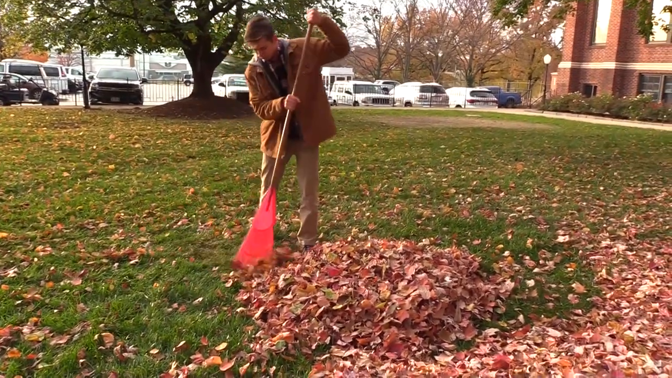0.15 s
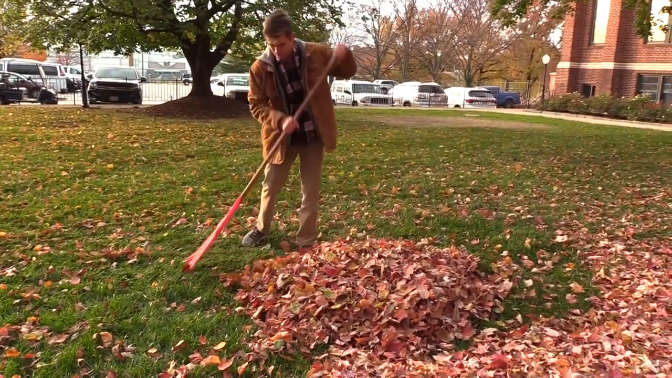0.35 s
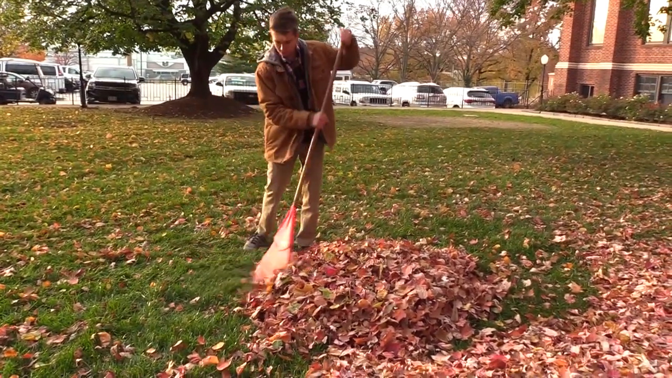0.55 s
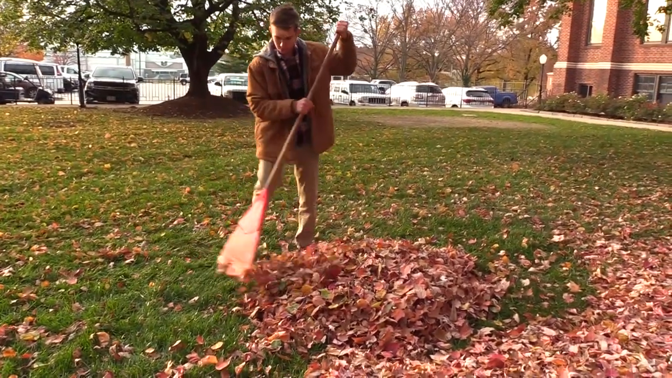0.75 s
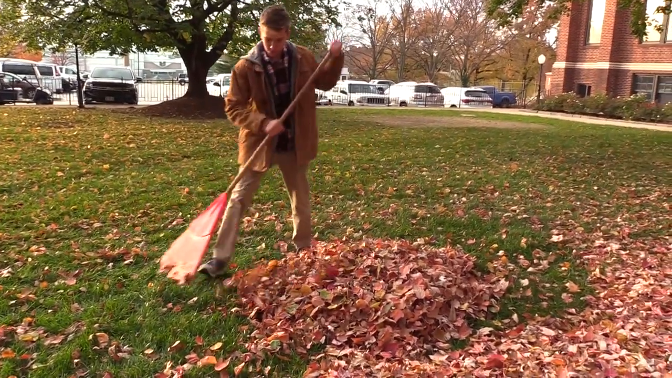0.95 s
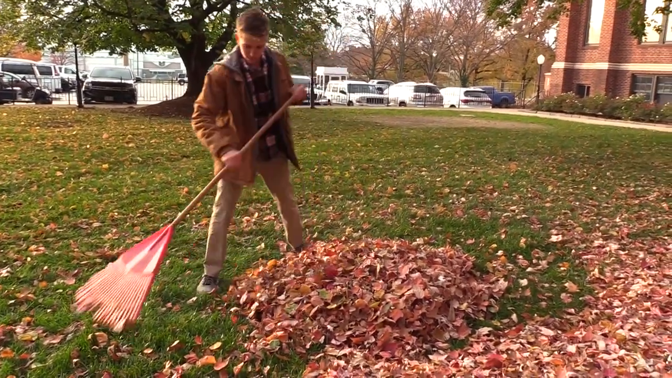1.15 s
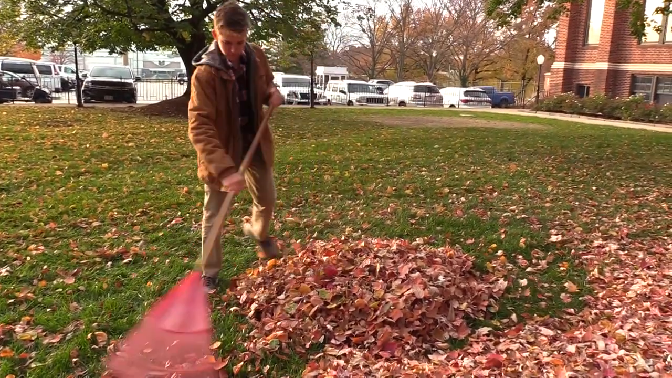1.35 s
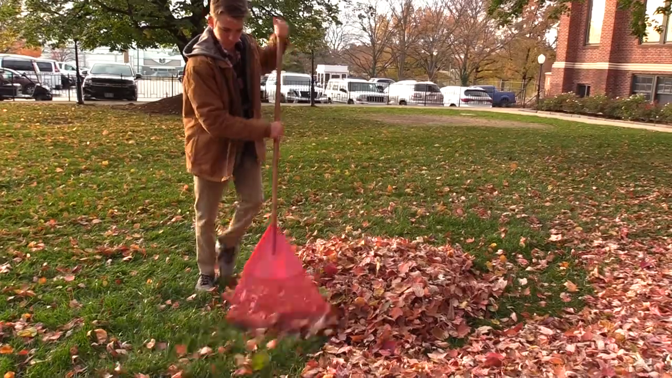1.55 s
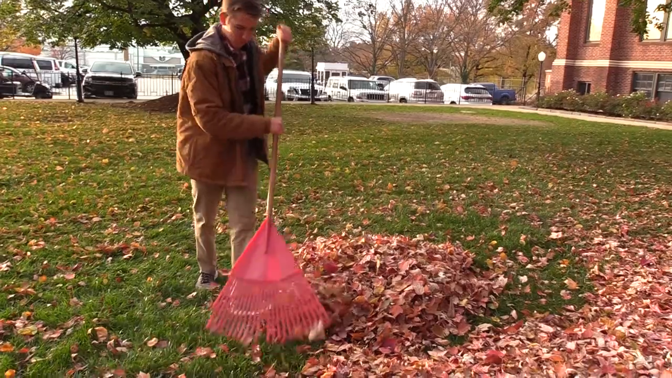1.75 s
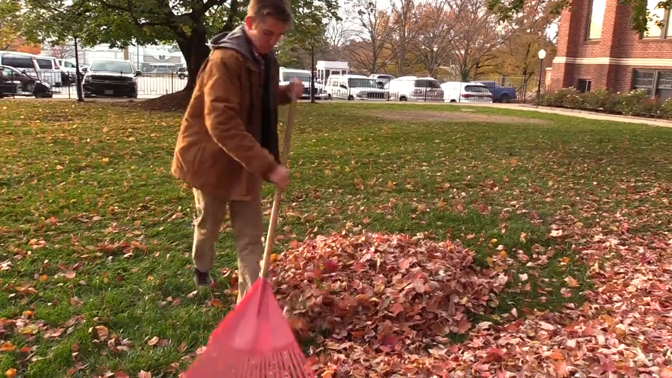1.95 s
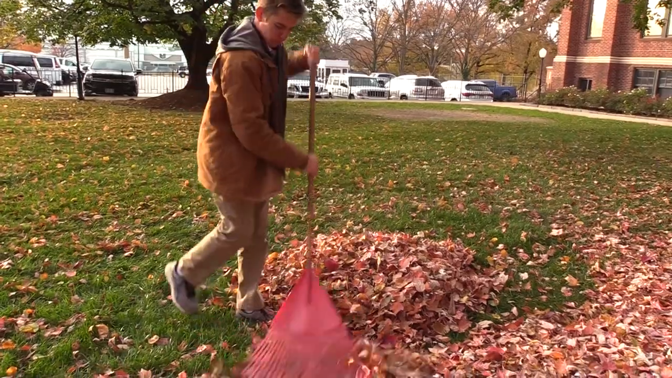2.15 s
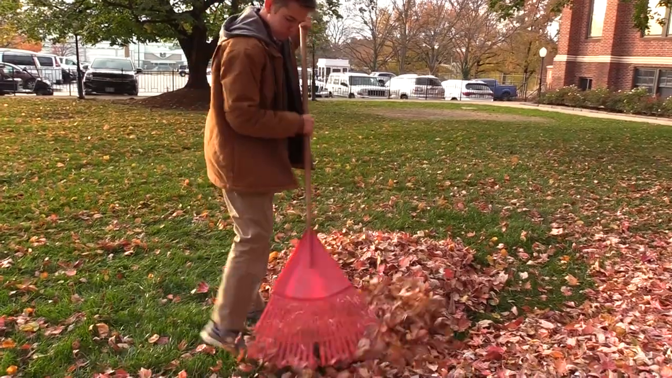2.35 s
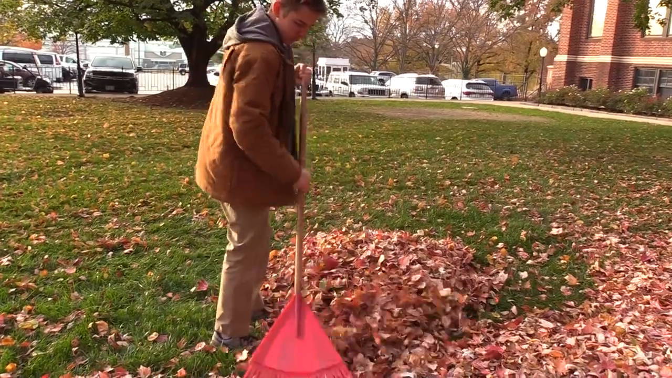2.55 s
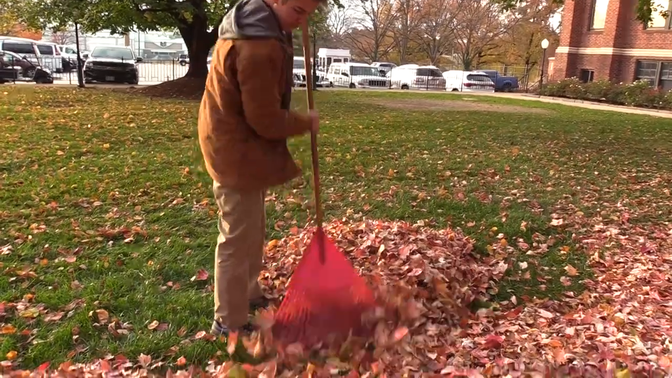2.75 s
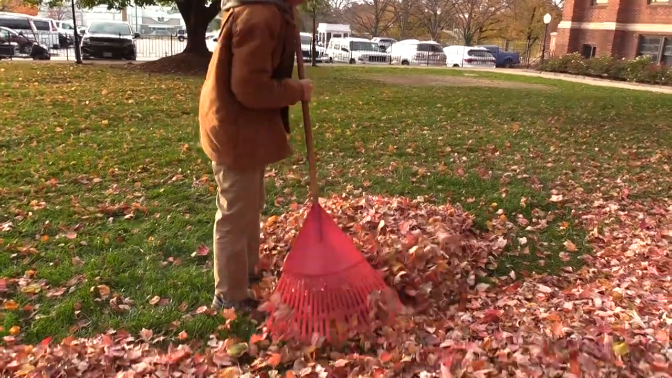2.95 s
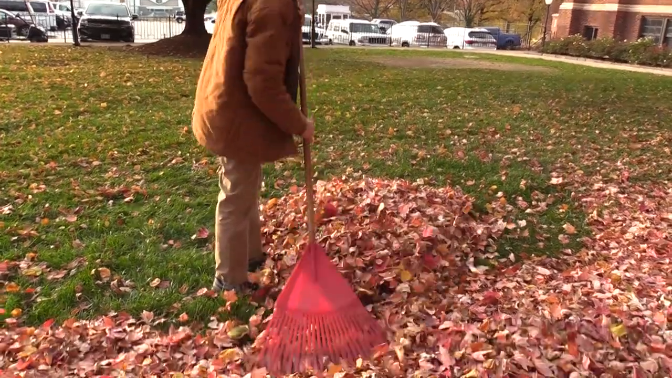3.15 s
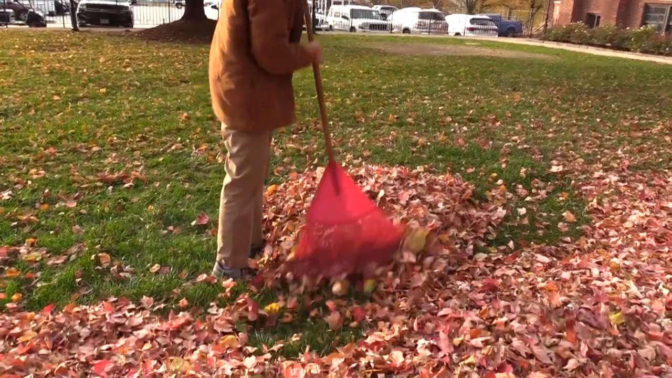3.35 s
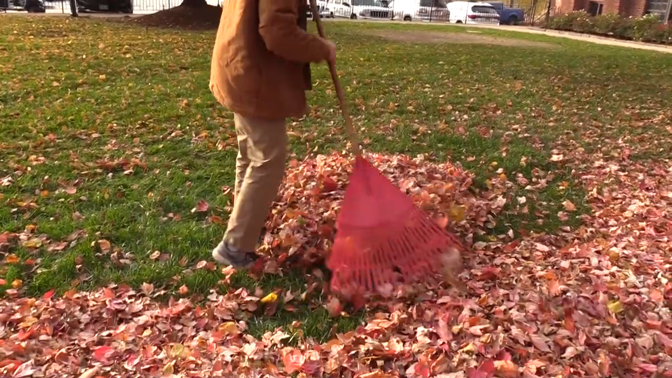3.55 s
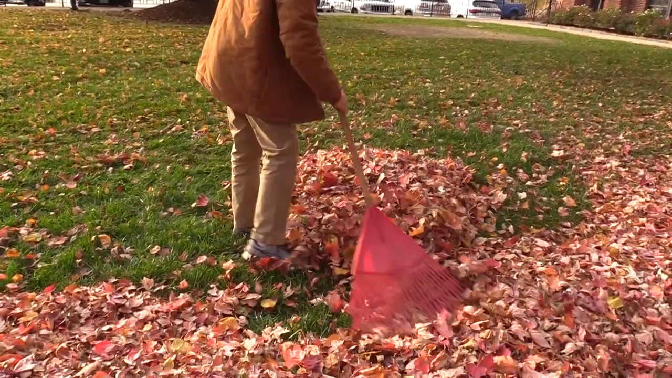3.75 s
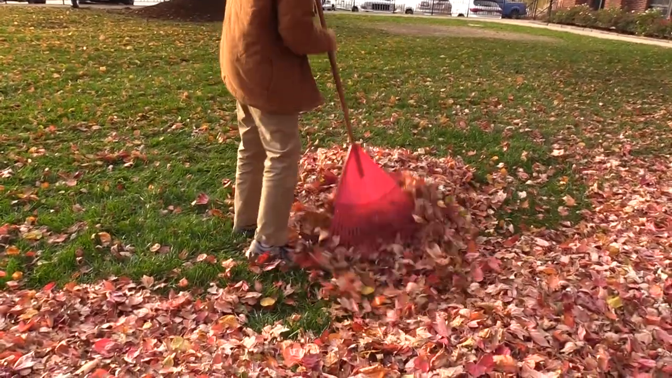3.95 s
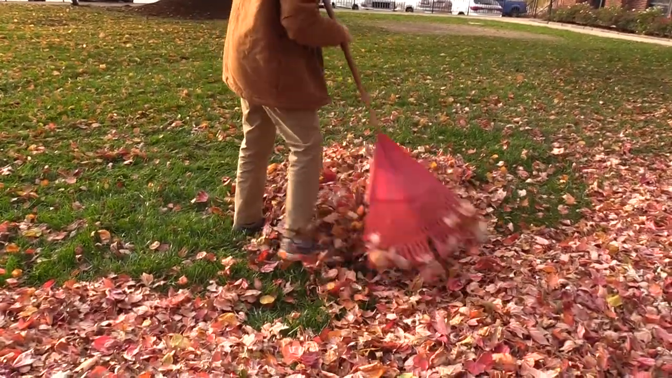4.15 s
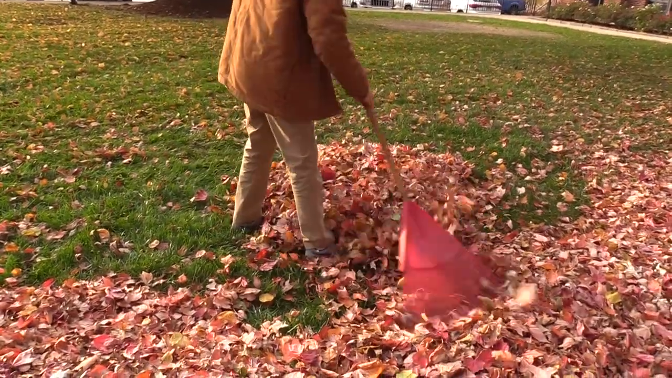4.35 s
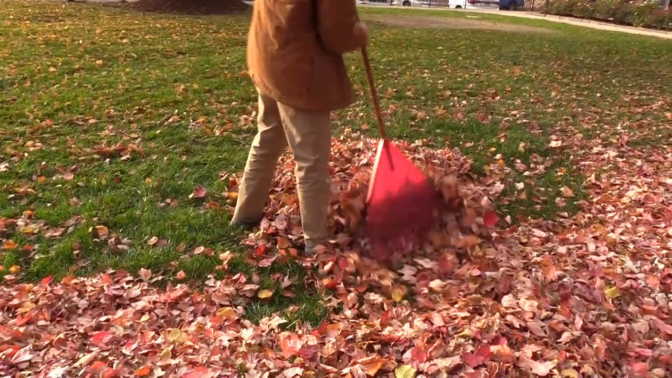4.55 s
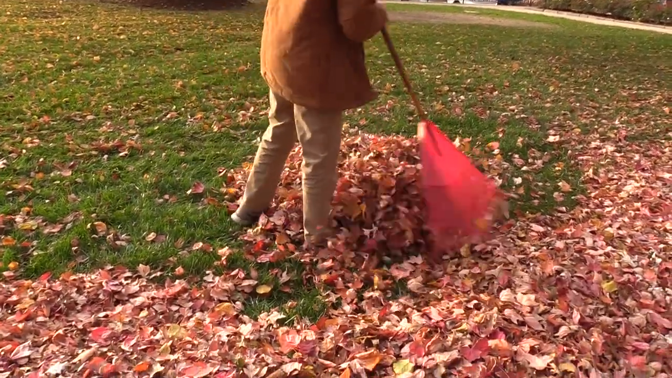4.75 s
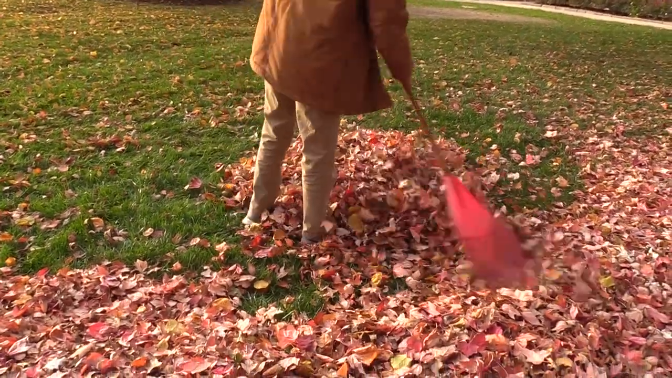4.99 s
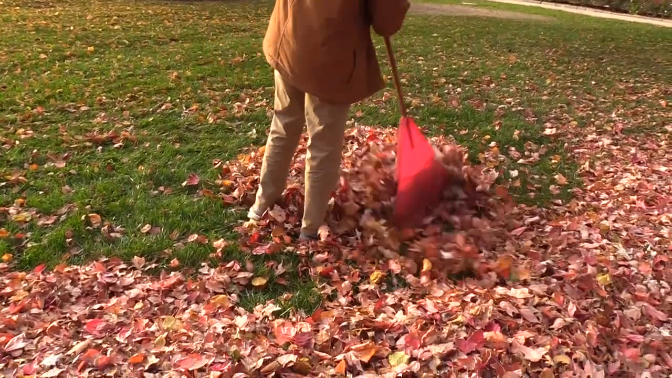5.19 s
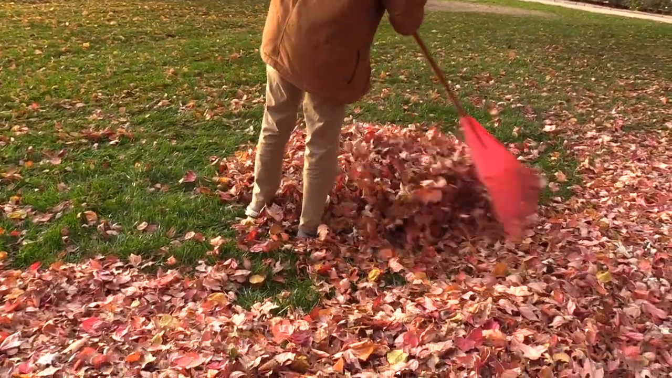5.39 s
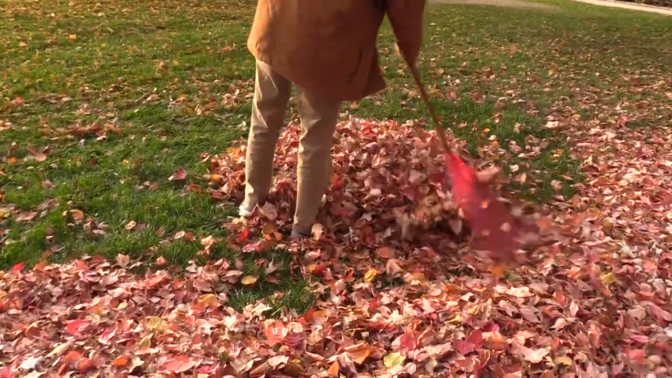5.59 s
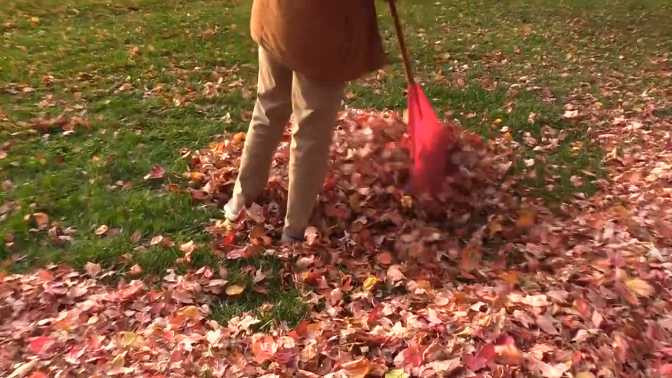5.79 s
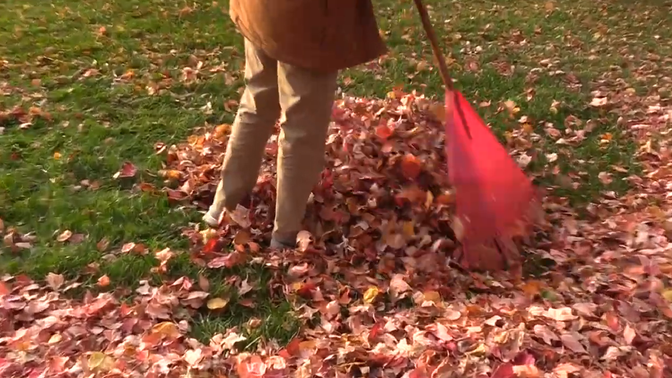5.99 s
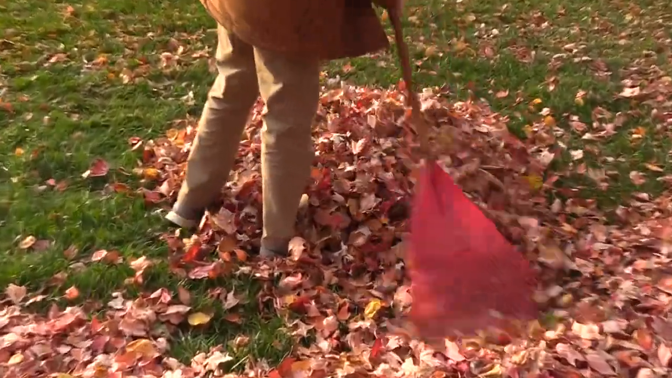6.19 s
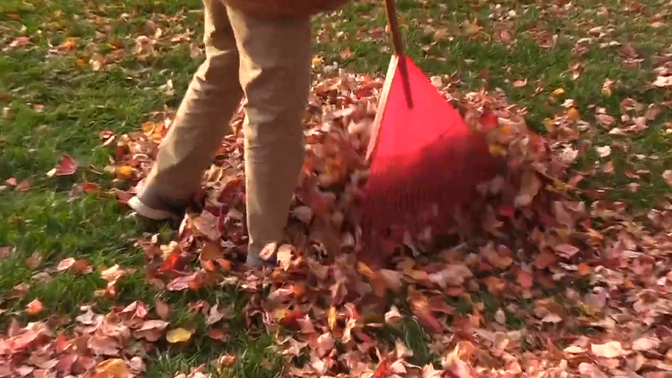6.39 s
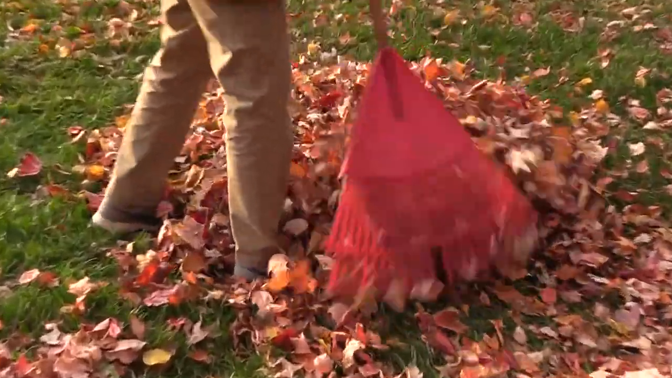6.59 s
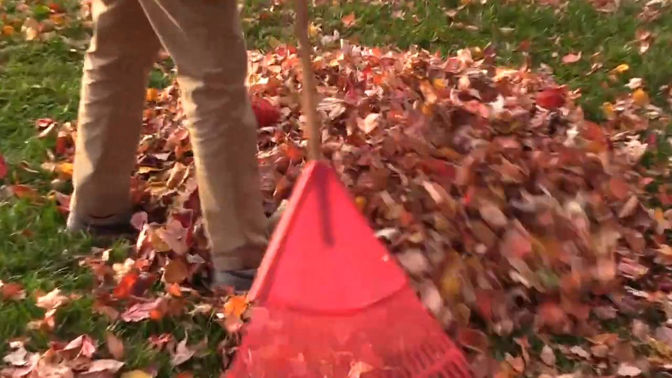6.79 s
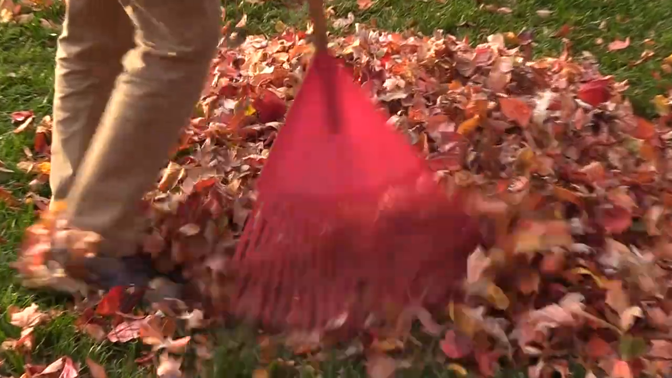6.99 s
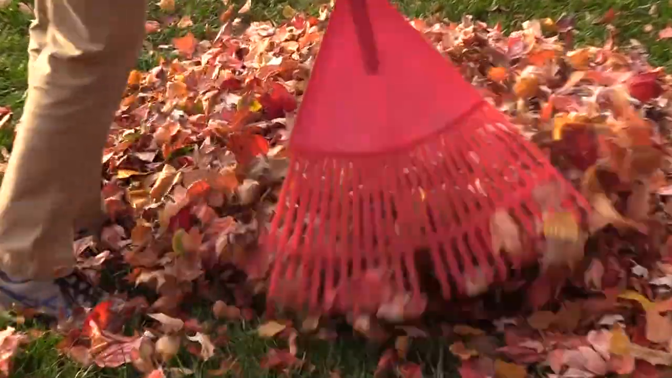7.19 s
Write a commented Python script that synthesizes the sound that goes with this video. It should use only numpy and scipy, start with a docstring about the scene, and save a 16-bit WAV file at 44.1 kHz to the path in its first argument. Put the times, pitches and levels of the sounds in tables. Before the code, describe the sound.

A plastic rake sweeps dry fallen leaves in a dozen crunchy strokes, growing louder, over low wind rumble and faint distant traffic.

```python
"""A plastic rake sweeps dry leaves into a pile on a lawn: a dozen strokes, growing louder as if coming nearer.
Each stroke is a dense shower of tiny fractures, coloured as crushed leaves, hissing tines and drag on the turf.
The fan booms on bare turf, stems snap in short noise bursts, and blows ring the damped modes of the plastic.
Behind the rake, shaped noise makes distant traffic and wind rumbling on the microphone; two wavering
tones are far engines. Both channels are alike."""
import sys
import numpy as np
from scipy import signal
from scipy.fft import rfft, irfft, next_fast_len
from scipy.io import wavfile

SR = 44100
rng = np.random.default_rng(int(sys.argv[2]) if len(sys.argv) > 2 else 0)


def dump(signal):
    """Clip the signal to [-1, 1] and save it as 16-bit WAV at the path in sys.argv[1]."""
    limited = np.clip(np.atleast_2d(signal).T, -1, 1)
    pcm = np.round(limited * 32767).astype(np.int16)
    wavfile.write(sys.argv[1], SR, pcm)


N = 318843  # samples, about 7.23 s

# Spectrum of crushed leaves: pitch_hz, relative level_db (per Hz)
LEAF_SPECTRUM = [(200, -49), (700, -18), (1500, -7.5), (2100, -6), (2550, -3.5), (2950, -1.25),
                 (3380, -1.5), (3700, -3.5), (4100, -7.5), (4700, -8.5), (6500, -15), (10000, -29),
                 (16000, -40)]
# Spectrum of tines combing leaves and grass: pitch_hz, relative level_db (per Hz)
COMB_SPECTRUM = [(1500, -32), (3500, -5), (5000, -1.5), (6500, 1), (8200, 0), (9500, -3), (12500, -7),
                 (14500, -10.5), (16000, -16.5)]
# Spectrum of the rake head dragging on the turf: pitch_hz, relative level_db (per Hz)
DRAG_SPECTRUM = [(90, -29), (190, -6), (310, -3), (500, 1), (750, -1), (1200, -1), (1800, -15.5),
                 (3000, -20)]


def raking():
    """Harder strokes break more leaves a second; the tines catch and slip, so the fractures come in clumps."""
    rustle_db, hiss_db, drag_db = effort()
    fractures_per_s = 80000 * gain_of(0.5 * (rustle_db + 15))

    crushing = crackle(fractures_per_s, spread_db=2.0, cycles=2.06, patchy_db=1.34)
    leaves = colour(crushing, LEAF_SPECTRUM) * gain_of(rustle_db + 1.74)

    combing = crackle(fractures_per_s, spread_db=1.0, cycles=1.55, patchy_db=1.1)
    comb = colour(combing, COMB_SPECTRUM)
    highpass = signal.butter(2, 10000, "high", fs=SR, output="sos")
    treble = signal.sosfiltfilt(highpass, comb)
    comb = comb + treble * (gain_of(0.89 * (hiss_db + 6.5)) - 1)  # stronger hiss is brighter
    tines = comb * gain_of(rustle_db + hiss_db + 0.78)

    scraping = crackle(fractures_per_s, spread_db=3.5, cycles=2.85, patchy_db=0.8)
    contact = 1 / (1 + gain_of(-35.5 - rustle_db) ** 2)  # a lifted rake no longer scrapes the turf
    turf = colour(scraping, DRAG_SPECTRUM) * contact * gain_of(rustle_db + drag_db + 1.4)
    return catches(per_s=86, decay_s=0.0068, depth=0.27) * (leaves + tines + turf)


def crackle(per_s, spread_db, cycles, patchy_db, count=18):
    """A shower of tiny fractures of random size, each ringing a few cycles at its own pitch; white overall."""
    size = next_fast_len(N)
    t = np.arange(1024) / SR
    clumps = np.arange(0, N + SR // 25, SR // 25)  # one every 40 ms
    total, power = 0, 0
    for hz in np.geomspace(400, 15000, count):
        clump_db = patchy_db * rng.standard_normal(len(clumps))  # each clump of leaves favours other pitches
        at = np.flatnonzero(rng.random(N) < per_s / count / SR)
        size_db = spread_db * np.minimum(rng.exponential(1, len(at)), 4)
        size_db = size_db + np.interp(at, clumps, clump_db)
        clicks = np.zeros(N)
        # Denser showers have smaller clicks, so density alone does not raise the level
        clicks[at] = rng.choice([-1, 1], len(at)) * gain_of(size_db) / np.sqrt(per_s[at])
        ring = rfft(np.exp(-t * hz / cycles) * np.cos(2 * np.pi * hz * t), size)
        ring /= abs(ring).max()
        total = total + rfft(evened(clicks), size) * ring
        power = power + abs(ring) ** 2
    return irfft(total / np.sqrt(power), size)[:N]


def catches(per_s, decay_s, depth):
    """A gain of unit rms: tines catch on a clump, let go at once, and the flurry dies away."""
    jolts = rng.exponential(1, N) * (rng.random(N) < per_s / SR)
    flurry = signal.lfilter([1], [1, -np.exp(-1 / (decay_s * SR))], jolts)
    return evened(np.sqrt(1 + abs(depth) * flurry))


# Pulls of the rake: landing start_s, rise_s to full speed, slow_s to slow down, rustle_db at full speed;
# then over that rustle: brush_db of leaves on the way down, land_db on landing, settle_db of settling
# leaves, hiss_db of the tines, drag_db on the ground
RAKE_STROKES = [(-0.108, .031, 0.29, -24, -16.5, -3, -20, -1.5, -4.5),
                (0.492, 0.074, .17, -22, -21, -3.5, -15, -4, -11),
                (1.379, .11, .15, -16.5, -27, -3, -15, -1, -8.5),
                (1.963, .17, .24, -13, -20, -10.5, -15, -3.5, -9),
                (2.538, 0.13, 0.26, -14, -15.5, -5.5, -13, -3, -9),
                (3.072, .21, .213, -13.5, -20.5, -8.5, -17.5, -5, -9),
                (3.649, .23, .157, -12, -19, -7.5, -11.5, -5, -10.5),
                (4.303, .13, 0.29, -13.5, -14, -7, -19, -4.5, -8.5),
                (4.917, .158, .231, -13, -13, -2.5, -12, -4.5, -11),
                (5.48, 0.2, .21, -14, -17, -4.5, -13.5, -4.5, -12.5),
                (6.092, .24, 0.18, -15, -16.5, -7, -13.5, -5.5, -9),
                (6.732, .27, .16, -13.5, -16, -12, -12.5, -5.5, -9.5)]
# Heaps of leaves shoved or tumbling over: loudest_s, length_s, level_db of their rustle
LEAF_HEAPS = [(0.095, 0.043, -26.5), (0.591, .058, -20.5), (0.735, .048, -26.5), (0.923, .52, -37.5),
              (1.586, .15, -18.5), (1.8, 0.25, -27), (2.345, 0.11, -21.5), (2.787, 0.098, -23),
              (2.915, 0.037, -20.5), (3.325, .035, -17.5), (4.071, 0.082, -22), (4.548, 0.085, -19.5),
              (5.182, 0.099, -20), (6.285, .14, -17)]
STIR_DB = -47.0  # leaves stirring when the rake is still


def effort():
    """Strokes and loose leaves add in power: rustle in dB, then hiss and drag in dB over the rustle."""
    power = sum(stroke(*row) for row in RAKE_STROKES)
    power = power + sum(heap(*row) for row in LEAF_HEAPS) + loose(gain_of(STIR_DB))
    rustle_db, hiss_db, drag_db = 10 * np.log10(power)
    return rustle_db, hiss_db - rustle_db, drag_db - rustle_db


LAND_S = 0.036  # the tines sink into the leaves
BRUSH_S = 0.265  # around the landing the fan brushes the top leaves
SLOWED_DB = -10.0  # drop of the rustle when the slowing time is over
SETTLE_DB_PER_S = 13.5  # the leaves that were moved come to rest
HISS_SAG_DB_PER_S, DRAG_SAG_DB_PER_S = 8, 11  # leaves gather in front of the tines and cushion them


def stroke(start, rise, slow, db, brush_db, land_db, settle_db, hiss_db, drag_db):
    """The rake comes down, speeds up, slows and leaves the pile settling: power of rustle, hiss and drag."""
    t = np.maximum(np.arange(N) / SR - start, 0)
    landing_db = land_db * np.cos(np.pi / 2 * np.minimum(t / rise, 1)) ** 2
    slowing_db = SLOWED_DB * (np.maximum(t - rise, 0) / slow) ** 2
    pull = np.minimum(t / LAND_S, 1) ** 2 * gain_of(db + landing_db + slowing_db)
    hiss = gain_of(hiss_db - HISS_SAG_DB_PER_S * (t - rise))
    drag = gain_of(drag_db - DRAG_SAG_DB_PER_S * (t - rise))

    rest_db = SETTLE_DB_PER_S * np.maximum(t - rise - slow, 0)
    settle = np.minimum(t / (rise + slow), 1) ** 2 * gain_of(db + settle_db - rest_db)
    pulled = np.array([pull, pull * hiss, pull * drag]) ** 2
    return pulled + loose(settle) + heap(start, BRUSH_S, db + brush_db)


def heap(s, length, db):
    """A heap of loose leaves swells and dies away."""
    return loose(gain_of(db) * swell(s, length))


SETTLE_HISS_DB, SETTLE_DRAG_DB = -4.5, -12  # hiss and drag over the rustle of loose leaves


def loose(size):
    """Leaves moving freely rustle, with less hiss and drag: power of the three."""
    return (size * gain_of([[0], [SETTLE_HISS_DB], [SETTLE_DRAG_DB]])) ** 2


# The fan pressed hard on bare turf: loudest_s, level_db, length_s
TURF_SCUFFS = [(0.04, -31.5, 0.18), (1.513, -21, 0.18), (3.24, -22.5, 0.15), (6.942, -22.5, 0.2)]
# Hollow resonances of the whole fan pressed down: pitch_hz, width_hz, relative level_db
FAN_HOLLOW = [(318, 79, 1.5), (637, 135, 3.5), (780, 41, -2.5)]


def scuffs():
    """With no cushion of leaves under it, the dragging fan booms like a shallow box."""
    friction = rng.standard_normal(N)
    pressure = np.zeros(N)
    for s, db, length in TURF_SCUFFS:
        pressure += gain_of(db) * swell(s, length)
    boom = np.zeros(N)
    for hz, width, db in FAN_HOLLOW:
        b, a = signal.iirpeak(hz, hz / width, fs=SR)
        boom += gain_of(db) * signal.lfilter(b, a, friction)
    return pressure * evened(boom)


# Single stems and leaves snapping: start_s, peak level_db, pitch_hz
STEM_SNAPS = [(0.1584, -15, 6960), (0.1735, -16, 7260), (0.5254, -18, 7210), (0.7378, -18, 7070),
              (1.1256, -26, 6290), (1.1677, -26, 7030), (1.3854, -17, 9900), (1.4014, -9, 8280),
              (1.4077, -6, 8220), (1.8224, -24, 6200), (1.8682, -16, 7980), (1.9939, -11, 7140),
              (2.963, -10, 6025), (2.997, -9.5, 9740), (3.0117, -14, 7680), (3.0638, -17, 6080),
              (3.5828, -20.5, 7010), (3.675, -18, 6326), (5.5033, -14, 6220), (6.1235, -8, 6490)]


def snaps():
    """A dry stem gives way in a millisecond burst, and the leaves around it shiver briefly."""
    out = np.zeros(N)
    t = np.arange(2500) / SR
    fade = np.exp(-t / 0.0015) + 0.36 * np.exp(-t / 0.011)  # snap, then shiver
    for s, db, hz in STEM_SNAPS:
        noise = rng.standard_normal(len(t))
        edges_hz = [hz * 0.55, min(hz * 1.6, SR / 2.2)]
        band = signal.butter(1, edges_hz, "band", fs=SR, output="sos")
        burst = signal.sosfilt(band, noise * fade)
        add(out, s, gain_of(db) * burst / abs(burst).max())
    return out


# The plastic fan striking or catching the ground: start_s, level_db (8 dB above the peak it is played at)
FAN_CLACKS = [(1.562, 1), (2.905, 9), (2.908, 9), (3.119, 1), (3.198, -8), (3.703, -8), (4.951, 3),
              (5.503, -5), (6.123, -4), (6.237, 8), (6.884, 8)]
# Modes of the plastic fan: pitch_hz (before detuning), relative level_db, t60_s
FAN_MODES = [(520, -6, 0.0084), (1230, -8, 0.0093), (2060, -12, 0.0076), (2800, -4, .008),
             (3210, 3, 0.0058), (5600, 1, 0.0034)]


def clacks():
    """A blow rings the heavily damped plastic fan, its modes detuned a little differently each time."""
    out = np.zeros(N)
    t = np.arange(2000) / SR
    for s, db in FAN_CLACKS:
        ring = np.zeros(len(t))
        for hz, level, t60 in FAN_MODES:
            struck_hz = hz * (1 + 0.058 * rng.uniform(-1.2, 1))
            ring += gain_of(level - 60 * t / t60) * np.sin(2 * np.pi * struck_hz * t)
        ring = ring * (1 - np.exp(-t / 0.00047))  # the tine bends before the fan takes up the blow
        add(out, s, gain_of(db - 8.0) * ring / abs(ring).max())
    return out


# Wind on the microphone: time_s, level_db (before a 3.5 dB lift)
WIND_GUSTS = [(0, -28), (0.3, -28), (0.62, -28), (1.7, -34), (1.93, -24.5), (2.15, -38), (2.45, -27.5),
              (2.74, -44), (2.98, -24.5), (3.5, -34), (3.8, -25), (4.0, -37), (4.25, -23.5), (4.75, -38),
              (5.45, -20), (6.35, -29), (6.55, -21.5), (7.23, -21)]
# Spectrum of the wind: pitch_hz, relative level_db (per Hz)
WIND_SPECTRUM = [(5, 4), (15, 2.5), (27, 3.5), (45, -4), (80, -8), (150, -27.5), (400, -35), (2000, -80)]
# Far engines droning, the low tone: time_s, level_db (before a 0.5 dB lift)
LOW_ENGINE = [(0, -25), (0.3, -23.5), (1.0, -29), (1.75, -25.5), (2.7, -37), (3.1, -29), (4.75, -40.5),
              (5.0, -28.5), (6.3, -35), (6.75, -24), (7.23, -30)]
# The high tone: time_s, level_db (before a 2.5 dB cut)
HIGH_ENGINE = [(0, -20), (0.15, -23), (0.45, -35.5), (2.4, -38.5), (2.55, -28), (3.65, -26.5), (4.0, -37),
               (4.43, -25.5), (4.7, -37), (7.23, -34.5)]
# Spectrum of distant traffic: pitch_hz, relative level_db (per Hz)
TRAFFIC_SPECTRUM = [(20, -18), (40, 1), (60, -1.5), (110, 1), (160, -7), (220, -12), (400, -13.5),
                    (650, -17.5), (950, -14.5), (1400, -21.5), (2200, -28.5), (6000, -48), (16000, -60)]
TRAFFIC_DB = -27


def outdoors():
    """Gusts on the microphone, two engine tones and, far off, a steady traffic wash."""
    (gust_db,), (low_db,), (high_db,) = follow(WIND_GUSTS), follow(LOW_ENGINE), follow(HIGH_ENGINE)
    wind = gain_of(gust_db + 3.5) * colour(rng.standard_normal(N), WIND_SPECTRUM)
    low = gain_of(low_db + 0.5) * drone(hz=60.6, waver=0.059)
    high = gain_of(high_db - 2.5) * drone(hz=104.4, waver=0.026)
    traffic = gain_of(TRAFFIC_DB) * colour(rng.standard_normal(N), TRAFFIC_SPECTRUM)
    return wind + low + high + traffic


def drone(hz, waver):
    """An engine tone whose pitch and strength drift."""
    pitch_hz = hz * (1 + waver * wander(5.7))
    tone = np.sin(2 * np.pi * np.cumsum(pitch_hz) / SR)
    return evened(tone * gain_of(2.4 * wander(5)))


def wander(rate):
    """Slow random drift of unit rms, mostly between rate / 10 and rate in Hz."""
    hz = np.fft.rfftfreq(N, 1 / SR)
    shape = (hz > rate / 10) / (1 + (hz / rate) ** 2)
    return evened(irfft(rfft(rng.standard_normal(N)) * shape, N))


def swell(s, length):
    """Half a cosine: rises from zero to one at time s and falls again, over length seconds."""
    return np.cos(np.pi * np.clip((np.arange(N) / SR - s) / length, -0.5, 0.5))


def colour(x, points):
    """Filters x by a spectrum table, at unit rms."""
    size = next_fast_len(N)
    hz, db = np.transpose(points)
    log_hz = np.log(np.fft.rfftfreq(size, 1 / SR) + 1)
    shape = gain_of(np.interp(log_hz, np.log(hz + 1), db))
    return evened(irfft(rfft(x, size) * shape, size)[:N])


def follow(rows):
    """Each column of a curve table, at every sample."""
    s, *columns = np.transpose(rows)
    return [np.interp(np.arange(N) / SR, s, c) for c in columns]


def gain_of(db):
    """Decibels to amplitude."""
    return 10 ** (np.asarray(db) / 20)


def evened(x):
    """Scales to an rms of one."""
    return x / np.sqrt(np.mean(x ** 2) + 1e-20)


def add(mix, s, sound):
    """Mixes a sound in at time s."""
    part = mix[max(round(s * SR), 0):][:len(sound)]
    part += sound[:len(part)]


def scene():
    """Everything reaches both channels alike."""
    mono = raking() + scuffs() + snaps() + clacks() + outdoors()
    return np.array([mono, mono])


EDGE_HZ = 15870  # upper band limit


def record(dry):
    """The highest peaks are rounded off below full scale; then the band limit."""
    limited = 0.95 * dry / (1 + dry ** 6) ** (1 / 6)
    lowpass = signal.firwin(801, EDGE_HZ, window=("kaiser", 9), fs=SR)
    return signal.oaconvolve(limited, lowpass[None], "same")


dry = scene()
out = record(dry)
dump(out)
```